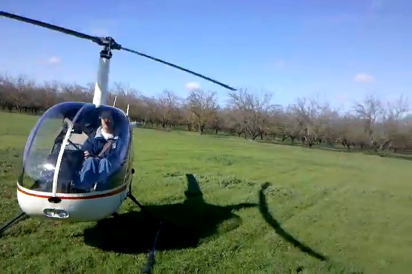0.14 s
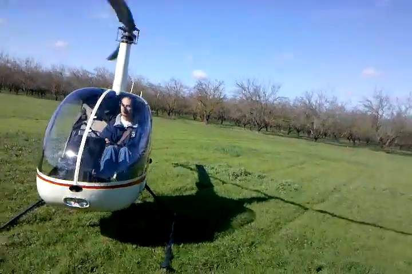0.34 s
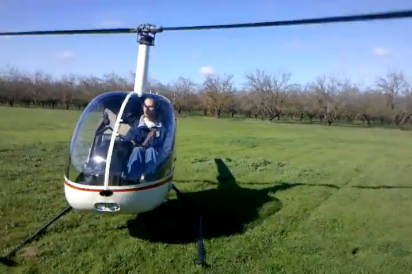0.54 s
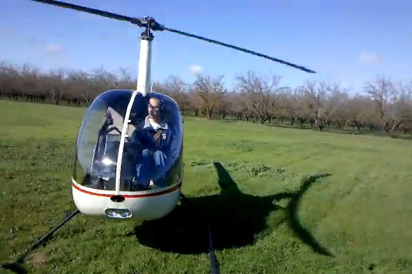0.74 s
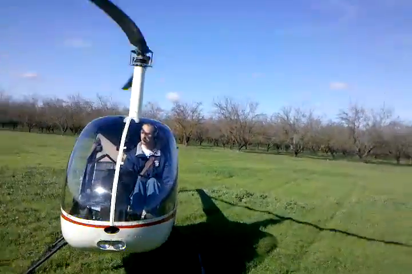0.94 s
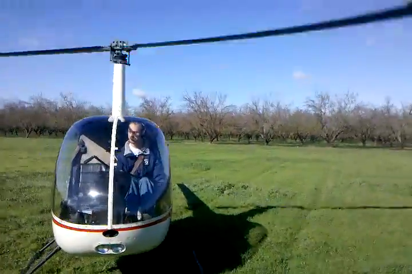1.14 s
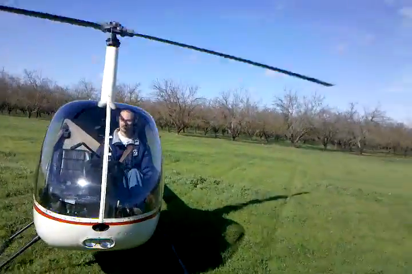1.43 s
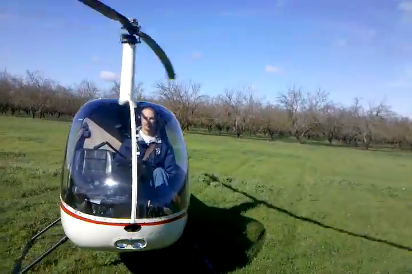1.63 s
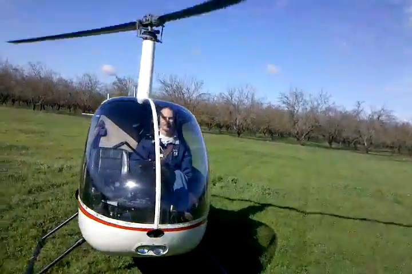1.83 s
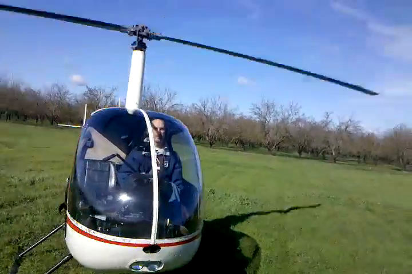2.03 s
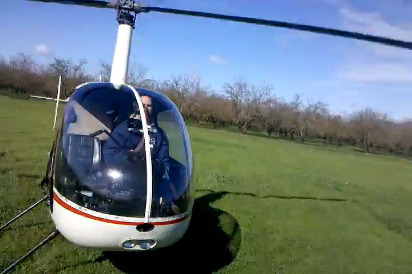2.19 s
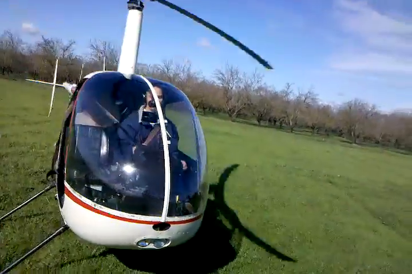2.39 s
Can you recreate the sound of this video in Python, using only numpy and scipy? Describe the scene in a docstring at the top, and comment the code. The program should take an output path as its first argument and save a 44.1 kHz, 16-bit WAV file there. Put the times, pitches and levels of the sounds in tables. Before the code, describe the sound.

Small helicopter blades chop rapidly over a puttering engine, drawing closer in an open field.

```python
"""Small helicopter on the grass

A two-bladed piston helicopter runs in an open field while the microphone is walked up to its nose.
The exhaust drones and putters over the steady downwash. Each passing blade adds a low chop, a whoosh
made hollow by its echo off the grass, and a high swish; one blade is a little louder.
The recorder is narrow-band and drops out once for an eighth of a second."""
import sys
import numpy as np
from scipy import signal
from scipy.fft import rfft, irfft, next_fast_len
from scipy.io import wavfile
from scipy.ndimage import map_coordinates

SR = 44100
rng = np.random.default_rng(int(sys.argv[2]) if len(sys.argv) > 2 else 0)


def transcribe(signal):
    """Save signal, clipped to [-1, 1], as a 16-bit WAV file at the path in sys.argv[1]."""
    frames = np.atleast_2d(signal).T
    limited = np.clip(frames, -1, 1)
    pcm = np.round(limited * 32767).astype(np.int16)
    wavfile.write(sys.argv[1], SR, pcm)


N = 112455

# Tones of the exhaust drone: firing_multiple, mid_walk_level_db, rise_db_per_s
DRONE_TONES = [(1, -45.5, 2), (2, -35.5, -1), (3, -31.5, 2), (4, -36.5, -2.7)]
# Strength of the four cylinders in firing order: level_db
CYLINDER_LEVELS = [2, -1.6, .5, -1]
# Spectra at the microphone: frequency_hz, relative_density_db
DOWNWASH_SPECTRUM = [(20, -52.5), (45, -31.5), (90, -13), (160, -0.5), (300, 6.5), (600, -1.5),
                     (1300, -6.5), (2500, -19.5), (4500, -18.5), (7000, -18.5)]
MUFFLER_SPECTRUM = [(220, -2.5), (320, 1.5), (450, -5), (700, -15.5), (1500, -29.5), (4000, -59)]
GAS_SPECTRUM = [(60, -61), (150, -6), (300, 6.5), (500, 2.5), (850, -5.5), (1400, -7), (2300, -18),
                (7000, -19)]
CHOP_SPECTRUM = [(40, -44.5), (100, -8.5), (190, 2), (340, -4.5), (550, -3.5), (950, -12.5), (2000, -25)]
WHOOSH_SPECTRUM = [(150, -31), (400, -6.5), (700, 2), (1000, 0), (1500, -3), (1850, -9.5), (2400, -12),
                   (4000, -27)]
SWISH_SPECTRUM = [(300, -33.5), (900, -6.5), (1600, 1.5), (2600, 0), (3600, 1), (5000, -1.5), (6200, 0.5),
                  (7000, -1)]
# Low chop as the microphone moves in under the blades: time_s, level_db
CHOP_LEVELS = [(0, -29.5), (0.599, -29), (.85, -26), (1.3, -23.5), (1.701, -26.5), (1.95, -21),
               (2.15, -23.5), (2.5, -16.5)]
# Treble roll-off of the recorder: frequency_hz, gain_db
RECORDER_ROLL_OFF = [(6900, 0.5), (7350, -16), (7900, -31), (8700, -35.5)]

FIRING_HZ = 58.13
BLADE_PASS_S, FIRST_PASS_S = .0859, .122  # at each pass a blade points at the microphone
TIME_S = np.arange(N) / SR
FROM_MID_WALK_S = TIME_S - N / 2 / SR


def amp(db):
    """Decibels to gain."""
    return 10 ** (np.asarray(db) / 20)


def unit(x):
    """Scale to rms 1."""
    return x / np.sqrt(np.mean(x ** 2) + 1e-20)


def gain_at(spectrum, hz):
    """Gain of a spectrum table, read along a log frequency axis."""
    frequency_hz, level_db = np.transpose(spectrum)
    return amp(np.interp(np.log(hz + 1), np.log(frequency_hz + 1), level_db))


def wobble(rate_hz):
    """A smooth random curve with rate_hz knots a second."""
    return map_coordinates(rng.standard_normal(4096), [TIME_S * rate_hz], mode="wrap")


def filtered(x, response):
    """Shape x by a gain that depends on frequency."""
    size = next_fast_len(N + SR // 2)
    return irfft(rfft(x, size) * response(np.fft.rfftfreq(size, 1 / SR)), size)[:N]


def noise(spectrum, envelope=1):
    """White noise under an envelope, coloured and scaled to rms 1."""
    return unit(filtered(envelope * rng.standard_normal(N), lambda hz: gain_at(spectrum, hz)))


def ring(spectrum, size=8192):
    """Causal impulse response with this spectrum."""
    cepstrum = irfft(np.log(gain_at(spectrum, np.fft.rfftfreq(size, 1 / SR))))
    cepstrum[1:size // 2] *= 2
    cepstrum[size // 2 + 1:] = 0
    return irfft(np.exp(rfft(cepstrum)))


def nearing(level_db, rise_db_per_s):
    """Gain that changes steadily as the microphone closes in, passing level_db at mid-walk."""
    return amp(level_db + rise_db_per_s * FROM_MID_WALK_S)


def downwash():
    """Air driven down by the rotor, a steady rush behind everything."""
    return noise(DOWNWASH_SPECTRUM) * nearing(-25, rise_db_per_s=.45)


def exhaust_drone(waver_db=.7, rough_db=1, lag_s=.0031):
    """A low pressure wave leaves the pipe just after each firing: a slightly unsteady hum."""
    cycles = FIRING_HZ * (TIME_S - lag_s)
    tones = np.zeros(N)
    for multiple, level_db, rise_db_per_s in DRONE_TONES:
        gain = nearing(level_db + waver_db * wobble(11.95), rise_db_per_s)
        tones += gain * np.cos(2 * np.pi * multiple * cycles)
    return np.sqrt(2) * tones * amp(rough_db * wobble(FIRING_HZ))


def exhaust_putter(jitter_s=.0004, scatter_db=4.5, low_cut_hz=262, gas_decay_s=.0051):
    """Each firing thumps through the muffler and lets out a short rush of gas."""
    count = int(N / SR * FIRING_HZ)
    timing, strength = rng.standard_normal((count, 2)).T
    start_s = np.arange(count) / FIRING_HZ + jitter_s * timing
    level_db = np.resize(CYLINDER_LEVELS, count) + scatter_db * np.tanh(strength)
    firings = np.bincount(np.clip(start_s * SR, 0, N - 1).astype(int), amp(level_db), N)
    thumps = signal.fftconvolve(firings, ring(MUFFLER_SPECTRUM))[:N]
    putter = unit(filtered(thumps, lambda hz: 1 - 1 / (1 + (hz / low_cut_hz) ** 14)))  # above the drone
    puffs = signal.lfilter([1], [1, -np.exp(-1 / (gas_decay_s * SR))], firings)
    gas = noise(GAS_SPECTRUM, puffs)
    return putter * nearing(-31, rise_db_per_s=1.3) + gas * nearing(-33, rise_db_per_s=1.3)


def blade_count(lead_s):
    """Blades gone by so far; a whole number lead_s ahead of each pass."""
    return (TIME_S + lead_s - FIRST_PASS_S) / BLADE_PASS_S


def blade_swells(half_width_s, lead_s=0, mismatch_db=.5, squareness=3.57):
    """A flat-topped swell for every blade that sweeps past, louder and softer in turn."""
    count = blade_count(lead_s)
    swells = np.zeros(N)
    for blade in (np.floor(count), np.floor(count) + 1):
        widths_away = np.abs(count - blade) * BLADE_PASS_S / half_width_s
        swells += amp(mismatch_db * np.cos(np.pi * blade)) * np.exp(-.5 * widths_away ** squareness)
    return swells


def with_grass_echo(x, mean_delay_s=.000945, swing_s=.00051, lag_s=.0036, echo_gain=.9):
    """The bounce off the grass arrives late; its delay swings with the blade, a hollow sweep."""
    delay_s = mean_delay_s + swing_s * np.cos(2 * np.pi * blade_count(-lag_s))
    return unit(x + echo_gain * np.interp(TIME_S - delay_s, TIME_S, x))


def blade_chop(lumpy_db=2):
    """The low beat that leads each pass, growing unevenly on the way in under the blades."""
    air = unit(noise(CHOP_SPECTRUM) * amp(lumpy_db * wobble(150)))
    level_db = np.interp(TIME_S, *np.transpose(CHOP_LEVELS))
    return air * blade_swells(half_width_s=.025, lead_s=.0057) * amp(level_db)


def blade_whoosh(grainy_db=1.8, narrowing_per_s=.092):
    """The hollow middle of each pass; close up, the blade goes by more abruptly."""
    air = with_grass_echo(noise(WHOOSH_SPECTRUM) * amp(grainy_db * wobble(200)))
    half_width_s = .029 * np.exp(-narrowing_per_s * FROM_MID_WALK_S)
    return air * blade_swells(half_width_s, lead_s=.0034) * nearing(-27.5, rise_db_per_s=2.5)


def blade_swish():
    """A short, high hiss as each blade points at the microphone."""
    return noise(SWISH_SPECTRUM) * blade_swells(half_width_s=.016) * nearing(-27, rise_db_per_s=1.5)


def scene():
    """Engine and rotor in an open field, on one microphone."""
    engine = exhaust_drone() + exhaust_putter()
    rotor = blade_chop() + blade_whoosh() + blade_swish() + downwash()
    return (engine + rotor)[None]


def record(dry, dropout_s=1.5885, resume_s=1.716, late_s=.066, top_hz=9000):
    """The recorder falls silent once, resumes slightly late and dulls the treble."""
    late = np.roll(dry[0], round(late_s * SR))
    broken = dry[0] * (TIME_S < dropout_s) + late * (TIME_S > resume_s)
    dulled = filtered(broken, lambda hz: gain_at(RECORDER_ROLL_OFF, hz))
    return filtered(dulled, lambda hz: np.clip((top_hz - hz) / 200, 0, 1))[None]


dry = scene()
out = record(dry)
transcribe(out)
```